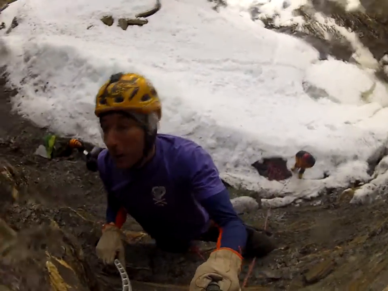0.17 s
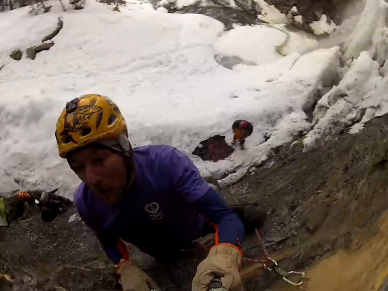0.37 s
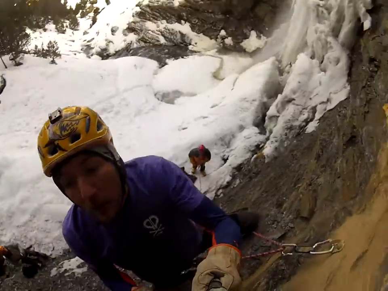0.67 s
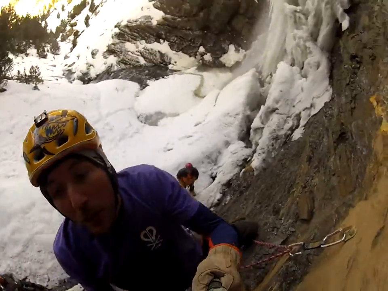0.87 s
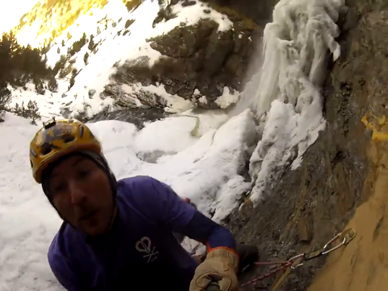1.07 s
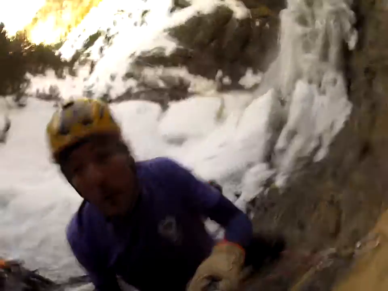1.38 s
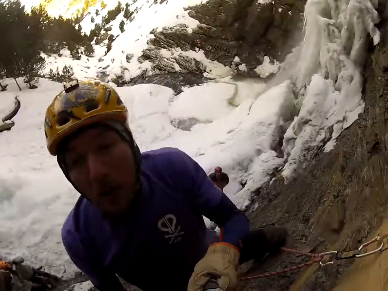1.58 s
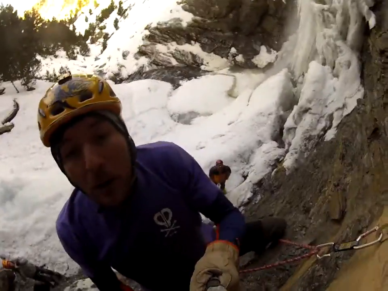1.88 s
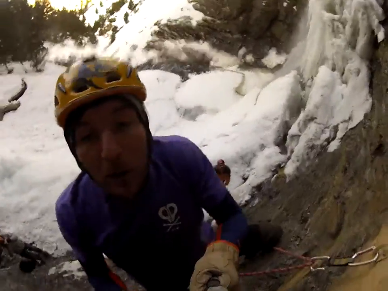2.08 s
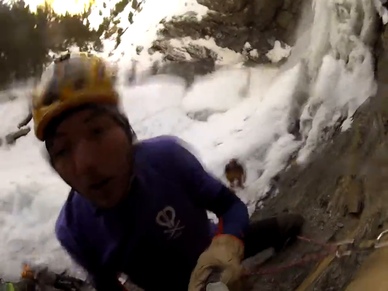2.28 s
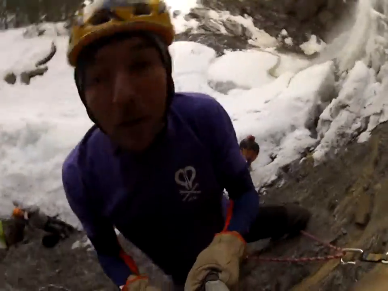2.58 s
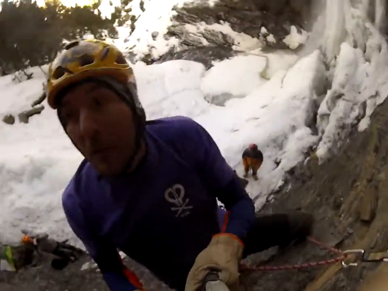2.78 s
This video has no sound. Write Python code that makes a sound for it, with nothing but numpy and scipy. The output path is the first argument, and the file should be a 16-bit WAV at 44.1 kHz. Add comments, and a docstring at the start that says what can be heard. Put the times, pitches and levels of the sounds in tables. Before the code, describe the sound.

Metal climbing tools clack and scrape on rock in sharp, gritty bursts over faint outdoor hiss

```python
"""A hiss and wavering low hum open the outdoor scene, sunk at first, then swell; each later bout sinks them again.
From 0.23 s steel climbing tools and spikes scrape and clack on rock, very close to a small camera, then pause.
From 1.16 s contacts crowd together with brief gaps until 2.7 s; now and then the steel pings, an enduring mode.
Each contact is stick-slip: a burst of tiny slips rings the same few short resonances.
Throughout, the recorder overloads and holds samples at a low rate: spectral images make a gritty treble."""
import sys
import numpy as np
from scipy import signal
from scipy.fft import rfft, irfft
from scipy.io import wavfile

SR = 44100
rng = np.random.default_rng(int(sys.argv[2]) if len(sys.argv) > 2 else 0)


def dump(signal):
    """Clip the signal to [-1, 1] and save it as 16-bit WAV at the path in sys.argv[1]."""
    limited = np.clip(np.atleast_2d(signal).T, -1, 1)
    pcm = np.round(limited * 32767).astype(np.int16)
    wavfile.write(sys.argv[1], SR, pcm)


N = 130095

# Strikes, with strengths in four registers before the common gain CLACK_DB:
# [onset t/s, nominal length t/s, knock f/Hz, ring f/Hz, thud level/dB, knock level/dB, ring level/dB, edge level/dB]
STRIKES = [(0.255, 0.00372, 626, 1687, -30, -53.5, -13, -14.5),
           (0.27, 0.01182, 689, 1704, -23.5, -25.5, -10, -13),
           (0.318, 0.003942, 511, 1877, -43.5, -40, -41.5, -57.5),
           (1.159, 0.0087125, 623.5, 1678, -15.5, -15, -6.5, -7.5),
           (1.203, 0.00402, 545, 1926, -36, -33.5, -34.5, -50.5),
           (1.221, 0.002288, 509.5, 1957, -41, -33, -34.5, -53.5),
           (1.287, 0.005584, 770.4, 2060, -34, -21, -18, -34),
           (1.318, 0.00306, 812.6, 1993, -38.5, -46.5, -27, -13.5),
           (1.345, 0.006094, 649.9, 1987, -19, -14, -13, -10.5),
           (1.356, 0.004443, 768.9, 1900, -24, -29.5, -9.5, -13),
           (1.386, 0.007637, 798, 1825, -40, -40.5, -22, -24),
           (1.429, 0.002432, 502.8, 1930, -48, -30, -17.5, -19),
           (1.451, 0.00789, 493.2, 1969, -31.5, -15.5, -11, -11),
           (1.489, 0.003138, 769.3, 1968, -23, -23.5, -11.5, -13.5),
           (1.51, 0.002265, 665.5, 1865, -44, -14.5, -12, -14),
           (1.5869, 0.0020174, 479, 1506, -48.5, -46.5, -22, -20),
           (1.809, 0.0029426, 827, 1714, -38.5, -31.5, -8.5, -24.5),
           (1.832, 0.007915, 535.1, 1703, -42, -32.5, -19, -26),
           (1.853, 0.00731, 770.3, 1704, -39.5, -39.5, -24.5, -35),
           (1.87, 0.010355, 719.5, 1647, -47, -40.5, -25, -26.5),
           (1.888, 0.007362, 692.9, 1674, -49, -29, -16, -22),
           (1.898, 0.00601, 671.4, 1649, -18, -20, -5, -17),
           (1.914, 0.005162, 804.5, 1644, -39.5, -34, -30.5, -39),
           (1.928, 0.00441, 802.6, 1676, -48, -48.5, -27, -39.5),
           (1.937, 0.003734, 615.9, 1548, -29.5, -24, -19.5, -17),
           (1.941, 0.005223, 508.2, 1676, -25, -15.5, -8, -12),
           (1.962, 0.0009773, 548.4, 1520, -33, -21, -17.5, -24.5),
           (2.063, 0.00806, 778.4, 1692, -39.5, -45, -42, -47),
           (2.077, 0.01048, 473, 1678, -45.5, -51, -36, -42),
           (2.107, 0.006317, 642.8, 1565, -12.5, -13.5, -4, -4.5),
           (2.134, 0.00605, 656.1, 1814, -49.5, -39.5, -30.5, -32),
           (2.156, 0.00655, 663.2, 1736, -49, -45, -30.5, -34.5),
           (2.185, 0.006706, 532.4, 1734, -22, -9.5, -14.5, -13.5),
           (2.2, 0.00885, 521.8, 2012, -35.5, -27, -19, -20),
           (2.223, 0.002768, 712, 1693, -31, -28, -13.5, -17),
           (2.248, 0.010213, 763.5, 1796, -26, -17.5, -14, -15),
           (2.303, 0.012855, 770.3, 1693, -31, -17, -14, -17.5),
           (2.314, 0.006775, 690.6, 2023, -33.5, -32, -21.5, -16),
           (2.322, 0.003142, 832.3, 1854, -37, -38.5, -16.5, -27.5),
           (2.344, 0.00247, 765, 1603, -49, -43.5, -30.5, -33.5),
           (2.378, 0.002027, 473, 1676, -53, -39.5, -33, -33),
           (2.4, 0.002415, 883.5, 1664, -40.5, -27, -11, -22.5),
           (2.405, 0.00549, 592.8, 1622, -21, -13.5, -13.5, -15),
           (2.417, 0.002447, 745.5, 1725, -34, -28.5, -30.5, -26),
           (2.426, 0.0014, 467.3, 1863, -38.5, -30.5, -30, -34.5),
           (2.459, 0.001939, 491.6, 1893, -56, -30.5, -23.5, -26.5),
           (2.473, 0.00292, 487.9, 1541, -54, -37, -35, -51.5),
           (2.636, 0.004108, 488.9, 1951, -18.5, -16, -6.5, -11.5),
           (2.68, 0.00681, 545.1, 1950, -26, -14, -8, -10.5),
           (2.703, 0.009205, 768.7, 1492, -37.5, -33, -33, -38.5)]
# Drags, with strengths before the common gain SCRAPE_DB:
# [onset t/s, length t/s, rise t/s, knock f/Hz, ring f/Hz,
#  thud level/dB, knock level/dB, ring level/dB, edge level/dB]
DRAGS = [(0.232, 0.058811, 0.02054, 702.5, 1690, -47.5, -27.5, -15, -17.5),
         (1.279, 0.040913, 0.01196, 632, 1895, -41.5, -32, -16.5, -17),
         (1.36, 0.012027, 0.001976, 715.8, 1909, -41.5, -30.5, -27.5, -42),
         (1.391, 0.04297, 0.001043, 516.9, 1936, -59, -33, -28, -31),
         (1.44, 0.11007, 0.007315, 753.4, 1966, -45, -25.5, -20, -23.5),
         (1.8, 0.04835, 0.00534, 696.5, 1698, -44.5, -36, -27.5, -44),
         (1.946, 0.013075, 0.0046, 679.6, 1848, -41.5, -27.5, -23.5, -22),
         (2.163, 0.02112, 0.00689, 494.8, 1753, -42.5, -35.5, -22.5, -24.5),
         (2.257, 0.005119, 0.000733, 548.2, 2064, -43, -22.5, -14.5, -14.5),
         (2.335, 0.051206, 0.002863, 509.4, 1784, -51.5, -40, -39, -44.5),
         (2.429, 0.023626, 0.02142, 723.6, 1892, -45, -36.5, -33, -33.5),
         (2.603, 0.035824, 0.016667, 496.6, 1776, -23, -21, -15.5, -21),
         (2.662, 0.00856, 0.002405, 506.8, 1898, -51, -24, -32.5, -46.5)]
# Steel left ringing, amplitude before waver and decay: [onset t/s, level/dB]
STEEL_PINGS = [(.293, -32.5), (1.322, -28.5), (1.833, -21), (1.875, -24), (1.905, -39.5), (1.943, -45),
               (2.113, -54), (2.2, -24), (2.265, -52.5)]
# Short resonances common to all contacts, gains before register balancing: [f/Hz, bandwidth f/Hz, level/dB]
SHARED_MODES = [(140, 207.08, -5), (503.86, 45.47, -5), (675.93, 330, -16), (1159.4, 170.7, -5.5),
                (1701.8, 86.12, -6), (1938.5, 53, -18.5), (2480.3, 173.93, -6.5), (2851.5, 100, 14),
                (3558.3, 54, -12)]
# Registers thud, knock, ring and edge: [lower f/Hz, upper f/Hz]
REGISTERS = [(45, 330), (380, 900), (980, 2200), (2280, 3850)]
# Relative spectrum of the outdoor hiss: [f/Hz, level/dB]
HISS_SPECTRUM = [(18, -34.5), (30, -3.5), (48, -10), (60, -31), (86, -8), (149, -5), (193, -6.5),
                 (302, -6.5), (481, -6.5), (589, -1), (1020, -18.5), (2800, -9), (3800, -18), (4940, -53.5),
                 (8360, -120)]
# Course of the hum before sinking: [t/s, f/Hz, level/dB]
HUM_COURSE = [(0, 62.97, -36.5), (0.218, 63.44, -41), (0.312, 65.03, -38), (0.398, 75.8, -49),
              (1.099, 62.03, -70), (1.172, 59.29, -35.5), (1.27, 68.76, -32.5), (1.36, 79.44, -39),
              (1.499, 69.12, -34), (1.66, 64.06, -39.5), (1.8, 60.05, -42), (1.95, 62.33, -33.5),
              (2.06, 70.89, -33), (2.2, 74.73, -37), (2.4, 70.73, -37.5), (2.55, 66.54, -37.5),
              (2.75, 63.66, -32.5), (2.95, 65.77, -34)]
# Sinkings of the background: [start t/s, deepest t/s, depth level/dB]
SINKINGS = [(-.1, 0.025, 14.5), (.25, 0.359, 15.5), (1.167, 1.248, 6.5), (1.297, 1.635, 19),
            (1.805, 1.99, 16), (2.122, 2.51, 13), (2.624, 2.8, 8)]

SLIPS_PER_S, SLIP_SPREAD_DB = 2200, 2.5
GRIT_DB = -6.5  # noise relative to the slips
DULL_DB = -19  # unresonated drive
KNOCK_WIDTH_HZ, KNOCK_DB = 46.07, 0
RING_WIDTH_HZ, RING_DB = 179.85, -1.5
CLACK_RISE_S, CLACK_FALL_S, CLACK_DB = 0.0010281, 0.0025037, 1.6461
CLACK_PRESSED_SHARE = 0.6664  # of the nominal length
SCRAPE_FALL_S, SCRAPE_DB = 0.0058194, 0.5
JUDDER_DB, JUDDER_S = 2.5, 0.0039712
PING_HZ, PING_T60_S = 3568, 0.12603
PING_WAVER_DB, PING_WAVER_S = 2, 0.007
HISS_DB = -40  # rms before sinking
RECOVER_DB_PER_S, SINK_CURVE = 140, 1  # a curve exponent of 1 sinks linearly in dB
HOLD_HZ, HOLD_STEPS, CUTOFF_HZ = 8000, 4, 15350
OVERLOAD, KNEE = 0.84, 6  # amplitude ceiling, sharpness of its approach


def amp(db):
    """Amplitude ratio: ten to the power of level over 20."""
    return 10 ** (np.asarray(db) / 20)


def unit(x):
    """Normalization: the root mean square becomes 1."""
    return x / np.sqrt(np.mean(x ** 2) + 1e-20)


def add(mix, s, sound):
    """Superposition: a sound adds to the mix from its onset."""
    part = mix[max(round(s * SR), 0):][:len(sound)]
    part += sound[:len(part)]


def waver(n, step_s):
    """Random fluctuation: straight lines join independent normal values, one every step."""
    return np.interp(np.arange(n) / SR / step_s, np.arange(n), rng.standard_normal(n))


def clacks(bands):
    """Impact: a point strikes and skids for a few milliseconds."""
    out = np.zeros(N)
    for s, length, knock_hz, ring_hz, *levels_db in STRIKES:
        force = press(CLACK_PRESSED_SHARE * length, CLACK_RISE_S, CLACK_FALL_S)
        add(out, s, contact(force, length, knock_hz, ring_hz, levels_db, bands))
    return amp(CLACK_DB) * out


def scrapes(bands):
    """Sliding friction: a point drags over the rock under a juddering force."""
    out = np.zeros(N)
    for s, length, rise, knock_hz, ring_hz, *levels_db in DRAGS:
        force = press(length, rise, SCRAPE_FALL_S)
        judder = amp(JUDDER_DB * np.tanh(waver(len(force), JUDDER_S)))
        add(out, s, contact(force * judder, length, knock_hz, ring_hz, levels_db, bands))
    return amp(SCRAPE_DB) * out


def contact(force, length, knock_hz, ring_hz, levels_db, bands):
    """Stick-slip excitation: tiny slips under a force ring the shared modes and two of the spot."""
    n = len(force)
    slips = (rng.random(n) < SLIPS_PER_S / SR) * rng.choice([-1, 1], n)
    slips = slips * amp(SLIP_SPREAD_DB * rng.standard_normal(n))
    drive = force * (unit(slips) + amp(GRIT_DB) * rng.standard_normal(n))

    spot_modes = [(knock_hz, KNOCK_WIDTH_HZ, KNOCK_DB), (ring_hz, RING_WIDTH_HZ, RING_DB)]
    body = amp(DULL_DB) * drive
    for hz, width_hz, db in list(SHARED_MODES) + spot_modes:
        body = body + amp(db) * resonate(drive, hz, width_hz)

    # each register is balanced to its own strength
    balanced = np.zeros(n)
    for band, db in zip(bands, levels_db):
        balanced += amp(db) * unit(signal.sosfilt(band, body))
    # energy in proportion to the nominal length
    return np.sqrt(length * SR / n) * balanced


def press(length, rise, fall):
    """Contact force: linear loading up to full force, hold, exponential release."""
    t = np.arange(0, length + 0.06, 1 / SR)  # 60 ms left for the release and ringing
    loading = np.minimum(t / rise, 1)
    release = np.exp(-np.maximum(t - length, 0) / fall)
    return loading * release


def resonate(x, hz, width_hz):
    """Damped resonance: one complex pole whose radius sets the bandwidth, with peak gain near 1."""
    r = np.exp(-np.pi * width_hz / SR)
    pole = r * np.exp(2j * np.pi * hz / SR)
    return 2 * signal.lfilter([1 - r], [1, -pole], x).real


def band_filters(order=3):
    """Spectral division: band-passes for thud, knock, ring and edge."""
    return [signal.butter(order, edges, "band", fs=SR, output="sos") for edges in REGISTERS]


def pings():
    """Free vibration: one high steel mode decays exponentially with an uneven level."""
    out, t = np.zeros(N), np.arange(SR // 4) / SR
    decay = np.exp(-np.log(1000) * t / PING_T60_S)  # down 60 dB after PING_T60_S
    for s, db in STEEL_PINGS:
        level = amp(db + PING_WAVER_DB * waver(len(t), PING_WAVER_S)) * decay
        add(out, s, level * np.sin(2 * np.pi * PING_HZ * t))
    return out


def background():
    """Amplitude modulation: hiss and hum sink and swell back together."""
    t = np.arange(N) / SR
    return (hiss() + hum(t)) * amp(-sunk_db(t))


def hiss():
    """Filtered noise: a spectral envelope shapes steady white noise."""
    hz = np.fft.rfftfreq(N, 1 / SR)
    points_hz, points_db = np.transpose(HISS_SPECTRUM)
    envelope = amp(np.interp(np.log(hz + 1), np.log(points_hz), points_db))
    envelope = envelope * (hz < HOLD_HZ / 2)
    return amp(HISS_DB) * unit(irfft(rfft(rng.standard_normal(N)) * envelope, N))


def hum(t):
    """Frequency modulation: phase accumulates a wavering low frequency."""
    at, points_hz, points_db = np.transpose(HUM_COURSE)
    phase = 2 * np.pi * np.cumsum(np.interp(t, at, points_hz)) / SR
    return amp(np.interp(t, at, points_db)) * unit(np.sin(phase))


def sunk_db(t):
    """Gain reduction: each dip deepens, then recovers at a constant rate; the deeper of overlaps holds."""
    sunk = np.zeros(N)
    for start, deepest, depth_db in SINKINGS:
        sink = np.clip((t - start) / (deepest - start), 0, 1) ** SINK_CURVE
        recovered_db = RECOVER_DB_PER_S * np.maximum(t - deepest, 0)
        sunk = np.maximum(sunk, depth_db * sink - recovered_db)
    return sunk


def scene():
    """Superposition: tools on rock over the outdoor background."""
    bands = band_filters()
    return (clacks(bands) + scrapes(bands) + pings() + background())[None]


def record(dry):
    """Sample-and-hold: coarse sampling, soft saturation, stepped output with images, then a low-pass."""
    coarse = signal.resample_poly(dry, HOLD_HZ, SR, axis=1)
    coarse = coarse / (1 + abs(coarse / OVERLOAD) ** KNEE) ** (1 / KNEE)
    held = np.repeat(coarse, HOLD_STEPS, axis=1)
    steps = signal.resample_poly(held, SR, HOLD_HZ * HOLD_STEPS, axis=1)[:, :N]
    low_pass = signal.firwin(255, CUTOFF_HZ, window=("kaiser", 8), fs=SR)
    return signal.oaconvolve(steps, low_pass[None], "same")


dry = scene()
out = record(dry)
dump(out)
```